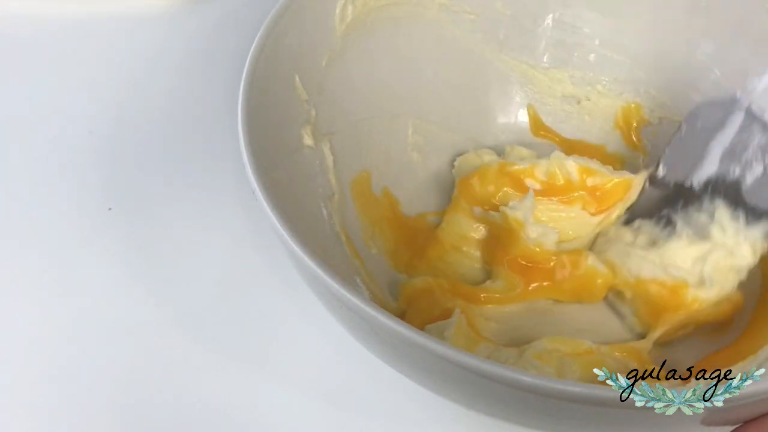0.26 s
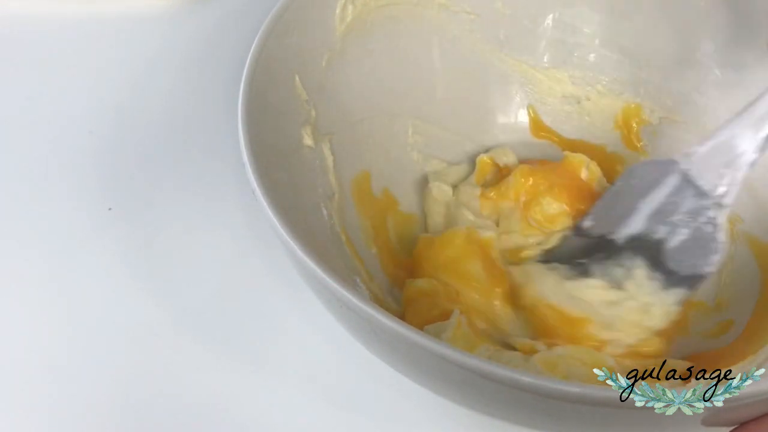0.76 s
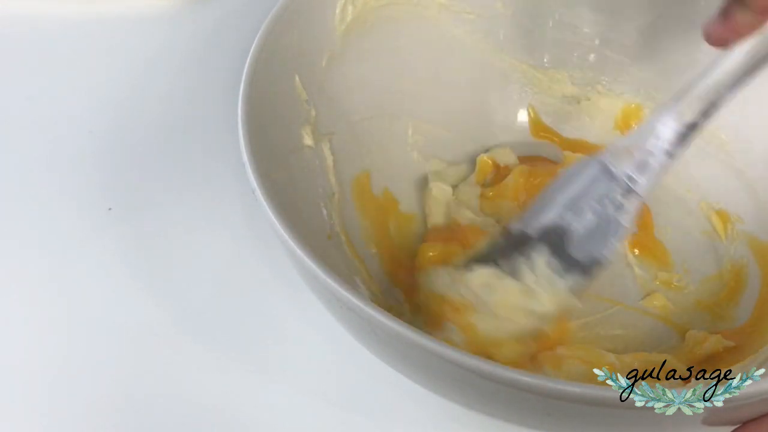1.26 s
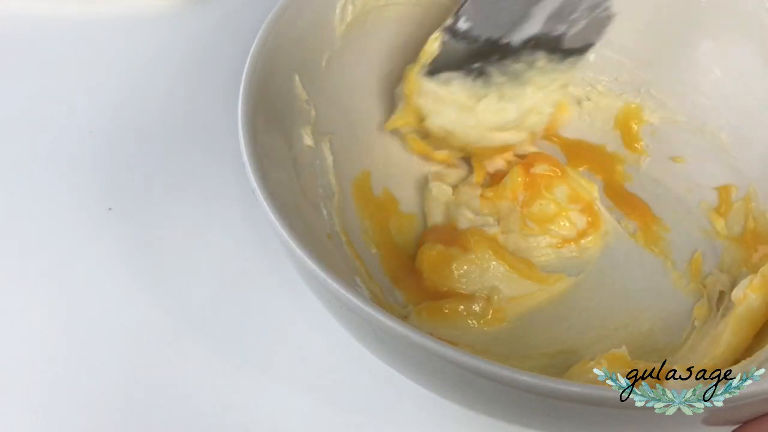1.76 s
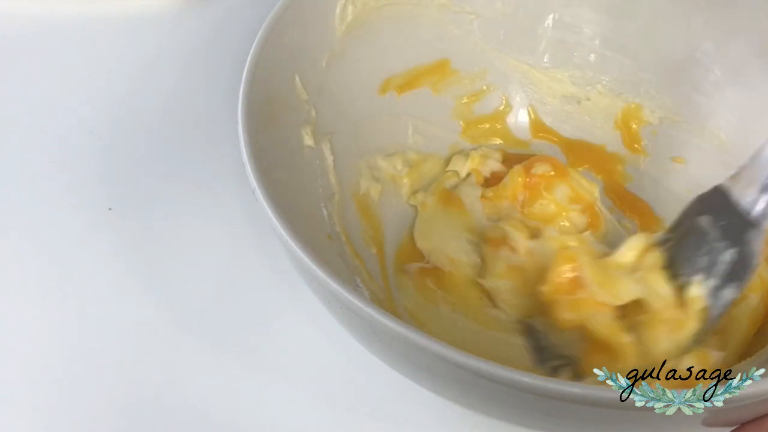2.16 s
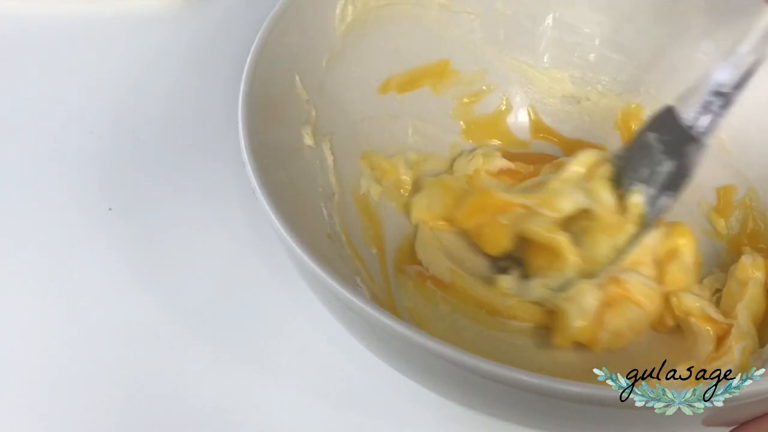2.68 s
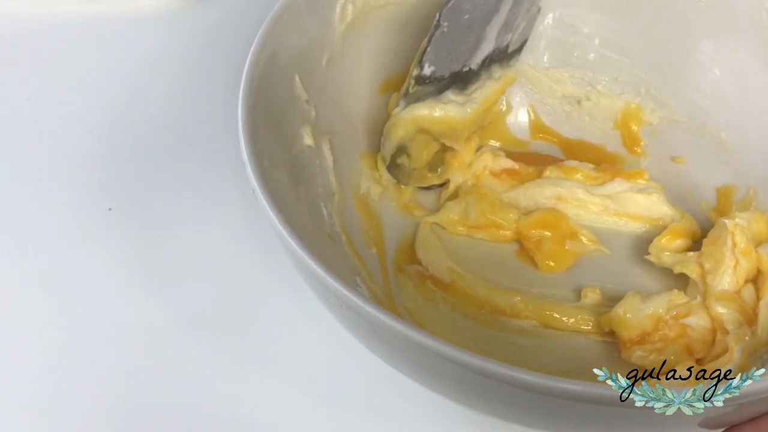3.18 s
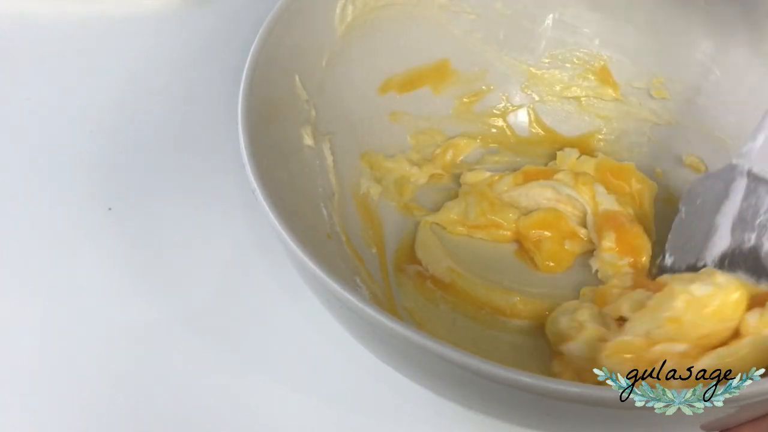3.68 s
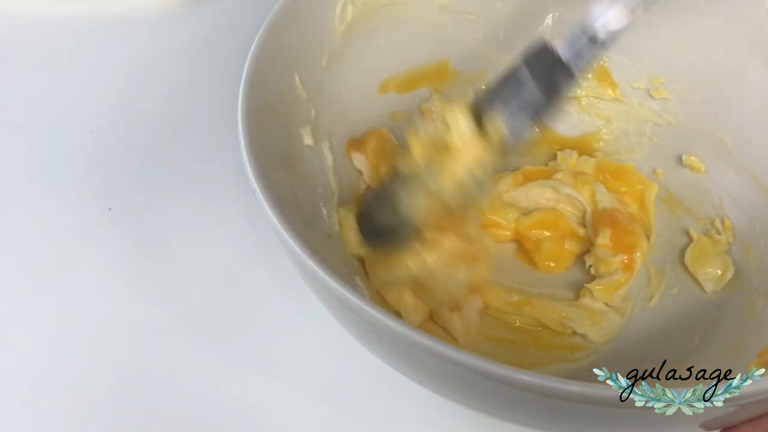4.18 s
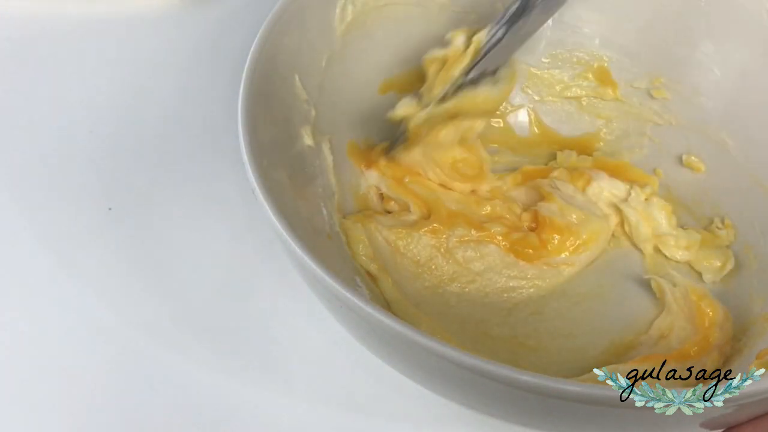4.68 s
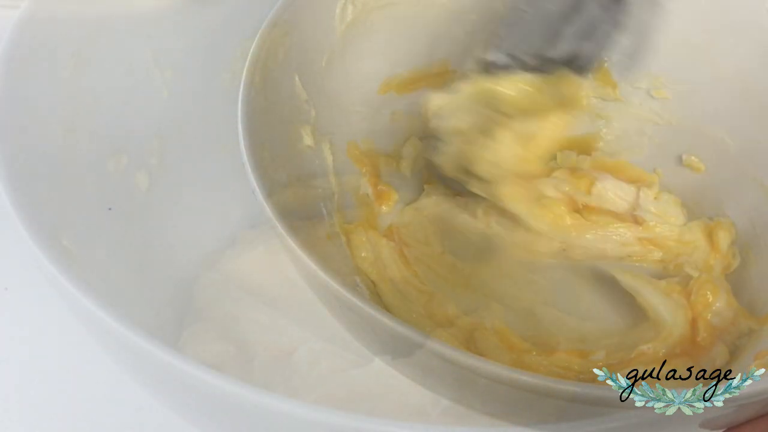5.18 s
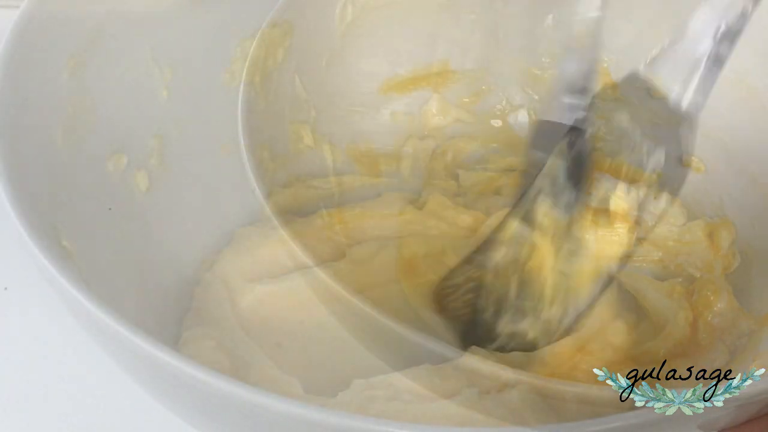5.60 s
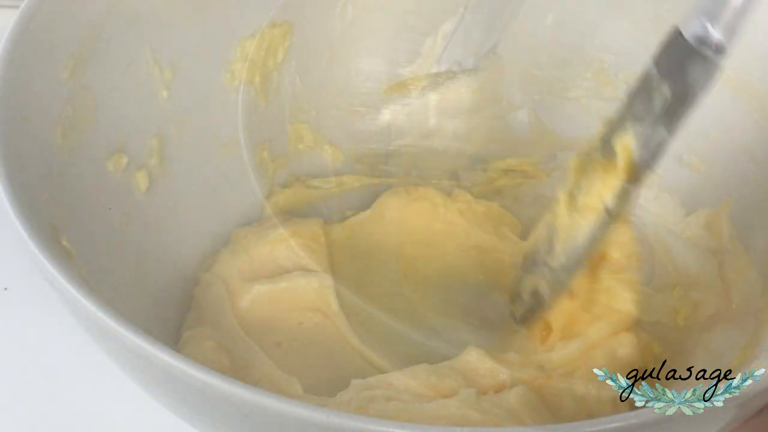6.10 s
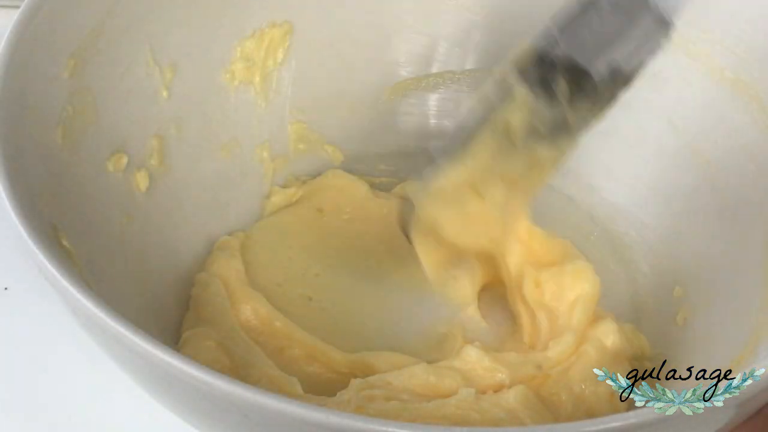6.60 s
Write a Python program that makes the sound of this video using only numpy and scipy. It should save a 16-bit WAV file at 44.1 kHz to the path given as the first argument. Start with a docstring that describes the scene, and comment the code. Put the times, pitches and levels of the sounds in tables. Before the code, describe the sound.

A spatula folds a sticky buttery paste in a ceramic bowl, with wet smacks, smearing wipes, squelches and dull bowl thumps in a small kitchen.

```python
"""A spatula folds egg yolk into soft butter in a ceramic bowl on a kitchen table, over room air, whine and hum.
A light bump opens it: pushes ring bowl and table top. Wet smacks and wipes follow at once: torn films
ring cavities, and noise grains make smear and crackle. Squelches, gliding bands of hiss, join soon after.
From 1.9 s a few lumps plop as short sine tones. The hardest bumps come between 2.6 s and 4.8 s, with one
long squeeze at 3.4 s. Then the bumps thin out while wipes and faint smacks go on. A small room answers."""
import sys
import numpy as np
from scipy import signal
from scipy.fft import rfft, irfft
from scipy.io import wavfile

SR = 44100
rng = np.random.default_rng(int(sys.argv[2]) if len(sys.argv) > 2 else 0)


def pcm_store(signal):
    """Save signal as 16-bit PCM."""
    levels = np.round(np.clip(np.atleast_2d(signal), -1, 1) * 32767)
    wavfile.write(sys.argv[1], SR, levels.astype(np.int16).T)


N = 302082

STIR_SMEAR_DB = -75   # light stirring between the wipes, before the smear's own trim


def from_db(db):
    """Turns decibels into an amplitude factor."""
    return 10 ** (np.asarray(db) / 20)


def rms_one(x):
    """Scales a signal to rms 1."""
    return x / np.sqrt(np.mean(x ** 2) + 1e-20)


def in_time(rows):
    """The columns of a curve, sample by sample."""
    s, *columns = np.transpose(rows)
    return [np.interp(np.arange(N) / SR, s, c) for c in columns]


def at_hz(points, hz):
    """Reads a curve over frequency on a log-frequency axis."""
    known_hz, values = np.transpose(points)
    return np.interp(np.log(np.maximum(hz, 1)), np.log(known_hz), values)


def coloured(x, spectrum):
    """Filters a signal by a spectrum; rms 1."""
    hz = np.linspace(0, SR / 2, N + 1)
    gain = from_db(at_hz(spectrum, hz))
    return rms_one(irfft(rfft(x, 2 * N) * gain)[:N])


def drift(rate):
    """A slow random wander: knots of spread 1, `rate` per second, joined by straight lines."""
    knots = rng.standard_normal(int(N / SR * rate) + 2)
    return np.interp(np.arange(N) / SR * rate, np.arange(len(knots)), knots)


def lowpass(x, hz, order=2):
    """Takes the treble off above a cut-off."""
    sos = signal.butter(order, min(hz, SR / 2 - 1), fs=SR, output="sos")
    return signal.sosfilt(sos, x + 1e-18)


def resonance(x, hz, width_hz):
    """A band of gain 1 on top."""
    b, a = signal.iirpeak(min(hz, SR / 2 - 1), hz / min(width_hz, SR / np.pi), fs=SR)
    return signal.lfilter(b, a, x)


def grains(per_s, spread_db):
    """Tiny ruptures at random moments, with random sizes and signs; rms 1."""
    size_db = spread_db * np.minimum(rng.exponential(1, N), 4)
    sizes = from_db(size_db) * rng.choice([-1, 1], N)
    return rms_one(sizes * (rng.random(N) < per_s / SR))


def knocks(rattle=0.018, rattle_s=0.016, thud_db=-6, slap_db=-41, slap_s=0.039, slap_rise_s=0.0014,
           slap_reach=1.9):
    """Each bump is one push, a brief rattle of the foot and a wet slap; a softer contact is duller."""
    # first dead thud of the contact, levels before thud_db: f/Hz, width/Hz, level/dB
    thud_bands = [(307, 33, 16.5), (540, 60, 15), (714, 117, 11.5)]
    # butter slapping the wall with each bump: f/Hz, relative level per hertz/dB
    slap_colour = [(200, -12), (450, 7), (800, 1), (1000, -5), (1500, -7.5), (2300, -23.5), (5000, -22),
                   (15000, -50)]
    out, t = np.zeros(N + SR), np.arange(SR) / SR
    splash = coloured(rng.standard_normal(N), slap_colour)
    slap_shape = from_db(slap_db) * (1 - np.exp(-t / slap_rise_s)) * np.exp(-t / slap_s)
    for s, db, contact_hz in bumps():
        at = int(max(s, 0) * SR)
        chatter = rattle * rng.standard_normal(SR) * np.exp(-t / rattle_s)
        bright_chatter = chatter - lowpass(chatter, 1700, order=1)
        push = lowpass(signal.unit_impulse(SR) + bright_chatter, contact_hz)
        thud = 0
        for k, (hz, width_hz, level_db) in enumerate(thud_bands):
            thud = thud + (-1) ** k * from_db(level_db + thud_db) * resonance(push, hz, width_hz)
        slap = lowpass(slap_shape * np.roll(splash, at)[:SR], slap_reach * contact_hz)
        ring = bowl(push, scatter_db=1.5, detune=0.022)
        out[at:at + SR] += from_db(db) * (lowpass(thud, 1130) + slap + ring)
    return out[:N]


def bumps():
    """The bowl bumps the table, then rocks back twice, weaker and duller each time."""
    # bumps: t/s, strength/dB, contact cut-off f/Hz, first rebound relative to the bump/dB
    table_bumps = [(.004, -14, 644, -13.5), (.624, -3, 1030, -16), (.763, -19.5, 2030, -27),
                   (1.361, -29.5, 910, -11), (1.919, -20.5, 890, -14), (2.022, -25, 850, -10),
                   (2.616, -6.5, 328, -26), (2.633, 2.5, 1080, -12.5), (3.255, 3.5, 1620, -11),
                   (3.929, 0.5, 1310, -19.5), (4.142, -16.5, 493, -20), (4.798, 1.5, 1200, -32),
                   (4.898, -9.5, 700, -26), (6.239, -22.5, 600, -17)]
    rock_s, rebound_loss_db, rebound_dulling = .05, 3.5, 0.71   # loss: second rebound below the first
    hits = []
    for s, db, hz, rebound_db in table_bumps:
        hits.append((s, db, hz))
        for k in range(1, 3):
            level_db = db + rebound_db - (k - 1) * rebound_loss_db
            hits.append((s + k * rock_s, level_db, hz * rebound_dulling ** k))
    return hits


def bowl(force, scatter_db=0, detune=0):
    """Rings the modes of bowl and table; neighbours swing oppositely, and the grip shifts high ones most."""
    # bowl and table top ring together, before scatter and detuning: f/Hz, level/dB, t60/s
    modes = [(52.4, -43, 0.83), (92.8, -40, 0.59), (133.1, -38.5, 0.8), (152, -39, 0.77),
             (176, -41.5, 0.067), (187, -27.5, 0.22), (209, -31, 0.085), (266.4, -36, 0.24),
             (291.8, -33, 0.14), (305.5, -36, 0.29), (360.4, -47, 0.44), (413, -44, 0.13),
             (439, -37.5, 0.13), (474.2, -30, 0.04), (488.5, -32, 0.11), (500, -49, 0.026),
             (577, -44.5, 0.21), (646, -43, 0.1), (686.3, -40, 0.12), (747.5, -37.5, 0.09),
             (793, -43, 0.094), (1195, -50.5, 0.11)]
    out = np.zeros(len(force))
    for k, (hz, db, t60) in enumerate(modes):
        shift = 1 + detune * min(hz / 1000, 1) * rng.normal()
        r = from_db(-60 / (t60 * SR))   # decay per sample
        w = 2 * np.pi * hz * shift / SR
        ring = signal.lfilter([0, np.sin(w)], [1, -2 * r * np.cos(w), r * r], force)
        out += (-1) ** k * from_db(db + scatter_db * rng.normal()) * ring
    return out


def plops(rise_s=0.00038):
    """A soft lump lands and gives one short, round tone: a decaying sine with a quick rise."""
    # lumps of butter drop back into the bowl: t/s, level/dB, f/Hz, t60/s
    lumps = [(1.924, -45.5, 196, 0.23), (2.022, -45.5, 269, 0.25), (2.051, -46.5, 174.7, 0.27),
             (5.657, -34.5, 184.5, 0.14)]
    out, t = np.zeros(N + SR), np.arange(SR // 2) / SR
    for s, db, hz, t60 in lumps:
        at = int(s * SR)
        shape = (1 - np.exp(-t / rise_s)) * np.exp(-np.log(1000) * t / t60)
        out[at:at + len(t)] += from_db(db) * shape * np.sin(2 * np.pi * hz * t)
    return out[:N]


def drag(smear_db):
    """The blade sticks and slips, and the bowl rumbles, more in a wipe and with swells where it catches."""
    # the blade catches on the bottom of the bowl: t/s, rumble level/dB, length/s
    catches = [(2.055, -54, 0.07), (5.785, -59.5, 0.15), (6.288, -64.5, .1)]
    drag_db, follows = -69, 0.44   # rumble under light stirring; share of the smear's swing in dB
    gain = from_db(drag_db + follows * (smear_db - STIR_SMEAR_DB))
    for s, db, length in catches:
        gain = gain + from_db(db) * pressure(s, length)
    slips = lowpass(grains(per_s=620, spread_db=6), 430, order=1)
    return gain * rms_one(bowl(slips))


def strokes():
    """The powers of the wipes add to steady light stirring; gives smear dB and crackle dB."""
    # the blade wipes the wall, levels before trims:
    # t of firmest pressure/s, smear level/dB, wet crackle level/dB, length/s
    wipes = [(0.081, -61, -66, .09), (.33, -60.5, -61.5, .05), (0.634, -59.5, -83, .05),
             (0.972, -58.5, -60.5, .075), (1.378, -61.5, -59.5, .055), (1.569, -58, -60, .05),
             (1.637, -62, -59, .04), (1.896, -59, -54, .025), (2.012, -59, -56.5, .05),
             (2.331, -67, -61, .04), (2.406, -72, -65, .035), (2.643, -55.5, -62.5, .035),
             (2.882, -61, -60.5, .035), (3.325, -60.5, -60.5, .07), (3.541, -55, -53, .085),
             (3.849, -60.5, -61, .085), (4.548, -60, -62, .06), (4.824, -61, -57, .045),
             (5.095, -59.5, -65, .045), (5.406, -59.5, -57, .035), (5.625, -62.5, -60, .05),
             (6.188, -64.5, -77, 0.061), (6.531, -69.5, -83, .12)]
    stir_crackle_db = -74
    smear_power, crackle_power = from_db(STIR_SMEAR_DB) ** 2, from_db(stir_crackle_db) ** 2
    for s, smear_db, crackle_db, length in wipes:
        press = pressure(s, length)
        smear_power = smear_power + (from_db(smear_db) * press) ** 2
        crackle_power = crackle_power + (from_db(crackle_db) * press) ** 2
    return 10 * np.log10(smear_power), 10 * np.log10(crackle_power)


def pressure(s, length):
    """The hand bears down on the blade, firmest at s, and lets go: a pointed exponential peak of 1."""
    press_share, release_share = 0.88, 1.1   # time constants as shares of the length
    t = np.arange(N) / SR - s
    away = np.abs(t) / (length * np.where(t < 0, press_share, release_share))
    return np.exp(-np.minimum(away, 10))


def smear(smear_db, wall_db=-3, flutter_db=4.0):
    """Paste shears along the wall in a grainy hiss whose level flutters."""
    # colour of the hiss: f/Hz, relative level per hertz/dB
    smear_colour = [(300, -7.5), (600, -1.5), (1000, -7.5), (2000, 1), (4000, -1), (6500, -14),
                    (15000, -30)]
    level = from_db(smear_db + wall_db + flutter_db * drift(90))
    return level * coloured(grains(per_s=1800, spread_db=3.0), smear_colour)


def crackle(crackle_db, clump_db=3.0, level_db=-1):
    """Fine bubbles burst in clumps as the butter parts: bright grains under a wandering level."""
    # colour of the bubbles: f/Hz, relative level per hertz/dB
    bubble_colour = [(2000, -7), (4500, -2.5), (7500, -3), (12000, -5), (16000, -11.5)]
    level = from_db(crackle_db + level_db + clump_db * drift(90))
    return level * coloured(grains(per_s=1400, spread_db=-1.5), bubble_colour)


def smacks(pockets, tear=0.15):
    """A film of butter cracks, tears on for a few milliseconds and rings the cavity behind it."""
    tear_s, crack_share = 0.0061, 0.54   # time to fall 27 dB; crack width as a share of its pitch
    out, t = np.zeros(N + SR), np.arange(SR // 20) / SR
    for s, cavity_db, cavity_hz, width_hz, crack_db, crack_hz in pockets:
        snap = tear * rng.standard_normal(len(t)) * np.exp(-np.pi * t / tear_s)
        snap[0] += 1
        cavity = resonance(resonance(snap, cavity_hz, width_hz), cavity_hz, width_hz)
        crack = resonance(snap, crack_hz, crack_share * crack_hz)
        at = int(s * SR)
        out[at:at + len(t)] += from_db(cavity_db) * cavity / np.abs(cavity).max()
        out[at:at + len(t)] += from_db(crack_db) * crack / np.abs(crack).max()
    return out[:N]


def small_pockets(smear_db, crack_db=-6, width=0.45, crack_ratio=1.04):
    """Faint smacks at random, likelier where the paste is worked harder: rows like the larger ones."""
    per_s, mean_db, spread_db = 3, -46.5, 5
    low_hz, high_hz = 7040, 13000
    work = np.cumsum(from_db(smear_db / 2))
    draws = rng.random((int(per_s * N / SR), 3))
    s = np.searchsorted(work, draws[:, 0] * work[-1]) / SR
    db = mean_db + spread_db * (2 * draws[:, 1] - 1)
    hz = low_hz * (high_hz / low_hz) ** draws[:, 2]
    return list(zip(s, db, hz, width * hz, db + crack_db, crack_ratio * hz))


def squelches(flutter_db=2.0):
    """Tiny ruptures ring a gap that changes size, so a band of hiss swells and glides."""
    # air squeezed along the blade, level before the swell:
    # start t/s, end t/s, level/dB, from f/Hz, to f/Hz
    glides = [(0.28, 0.373, -59.5, 2720, 3480), (0.794, .92, -70, 3500, 3400),
              (1.51, 1.66, -62, 3060, 1680), (2.827, 2.92, -69, 3930, 4200),
              (3.33, 3.417, -61.5, 2600, 3020), (3.558, 3.764, -58.5, 3500, 5300),
              (3.686, 3.945, -64, 2440, 1800), (4.795, 4.84, -55.5, 3600, 4000),
              (5.063, 5.13, -59.5, 890, 745), (5.453, 5.77, -66, 2180, 1230),
              (6.226, 6.41, -69.5, 540, 470)]
    # one long, hard squeeze round the wall, level before squeeze_db: t/s, gap f/Hz, level/dB
    squeeze = [(3.41, 1610, -57), (3.48, 1410, -53.5), (3.568, 2130, -50.5), (3.62, 2000, -51.5),
               (3.676, 1640, -59), (3.7, 1740, -62)]
    glide_width, squeeze_width, squeeze_db = 0.27, 0.14, -1.5   # half-widths as shares of the mean pitch
    out = np.zeros(N)
    shear = grains(per_s=1300, spread_db=0.5) * from_db(flutter_db * drift(80))
    for start, end, db, from_hz, to_hz in glides:
        span = slice(int(start * SR), int(end * SR))
        hz = np.geomspace(from_hz, to_hz, span.stop - span.start)
        swell = np.sin(np.linspace(0, np.pi, len(hz))) ** 0.35
        out[span] += from_db(db) * swell * gap(shear[span], hz, glide_width)
    hz, db = in_time(squeeze)
    span = slice(int(squeeze[0][0] * SR), int(squeeze[-1][0] * SR))
    fade = signal.windows.tukey(span.stop - span.start, .15)
    out[span] += from_db(db[span] + squeeze_db) * fade * gap(shear[span], hz[span], squeeze_width)
    return out


def gap(shear, hz, width):
    """A resonance that glides along a pitch curve; rms 1."""
    turn = np.exp(2j * np.pi * np.cumsum(hz) / SR)
    # shift the gliding pitch to zero, keep what lies near it, shift back
    near = lowpass(shear / turn, width * hz.mean())
    return rms_one(np.real(turn * near))


def kitchen(x, gap_s=.006):
    """Diffuse reverberation: decaying bands of noise, longest near 1 kHz, scaled to unit energy."""
    # what the walls give back: f/Hz, level/dB
    walls = [(100, 1), (3500, -7), (6000, -7), (15000, -0.5)]
    # reverberation time: f/Hz, t60/s
    room_t60 = [(100, 0.31), (1000, 0.7), (3500, 0.39), (8000, 0.35), (16000, 0.15)]
    t = np.arange(SR) / SR
    edges, tail = np.geomspace(60, 17000, 12), 0
    for low, high in zip(edges, edges[1:]):
        sos = signal.butter(2, [low, high], "band", fs=SR, output="sos")
        band = signal.sosfilt(sos, rng.standard_normal(SR))
        hz = np.sqrt(low * high)
        decay = np.exp(-np.log(1000) * t / at_hz(room_t60, hz))
        tail = tail + band * from_db(at_hz(walls, hz)) * decay
    tail = tail * (t > gap_s)
    return signal.fftconvolve(x, tail / np.linalg.norm(tail))[:N]


def background():
    """Still room air as coloured noise, a steady whine of sines and a low hum that wavers."""
    # room air: f/Hz, relative level per hertz/dB
    air_colour = [(15, -46), (25, -6.5), (70, 1.5), (157, -6.5), (545, -20), (1020, -20.5), (1890, -24.5),
                  (2050, -27.5), (2690, -28), (2990, -26.5), (4740, -33.5), (5880, -29), (7510, -33),
                  (13200, -30), (16000, -35)]
    # a thin, steady electrical whine: f/Hz, rms level/dB
    whine_tones = [(1001, -81), (2003, -82.5), (3005, -81.5), (4006, -81.5), (5008, -85.5), (6010, -82.5),
                   (7011, -83.5), (8013, -92), (9014, -82.5), (11017, -84)]
    air_db, hum_hz, hum_db = -59, 50.4, -60.5
    t = np.arange(N) / SR
    air = from_db(air_db) * coloured(rng.standard_normal(N), air_colour)
    whine = 0
    for hz, db in whine_tones:
        whine = whine + from_db(db) * np.sqrt(2) * np.sin(2 * np.pi * (hz * t + rng.random()))
    hum_level = from_db(hum_db + 2 * drift(5)) * np.sqrt(2)
    hum = hum_level * np.sin(2 * np.pi * hum_hz * t + drift(4))
    return air + whine + hum


def scene(thump_room_db=-12, smack_room_db=-7.5, paste_room_db=-10):
    """Everything sounds close by, with the kitchen answering."""
    # the larger air pockets open in the paste:
    # t/s, cavity peak level/dB, cavity f/Hz, cavity width/Hz, crack peak level/dB, crack f/Hz
    large_pockets = [(.047, -25, 2900, 1700, -39, 9000), (.056, -29.5, 5560, 5040, -23.5, 9800),
                     (.435, -42, 5000, 6000, -36, 12000), (.68, -33.5, 6140, 1900, -26.5, 11800),
                     (.763, -28.5, 3500, 3530, -36, 11000), (.795, -25.5, 3630, 1410, -39, 9100),
                     (.986, -30, 2360, 1000, -29, 4370), (1.006, -31.5, 4070, 3000, -39, 11000),
                     (1.362, -36, 12900, 7000, -50, 6000), (1.389, -35.5, 3670, 900, -49, 9000),
                     (1.494, -28, 8500, 4000, -38, 13000), (1.636, -47, 2500, 4000, -34.5, 9100),
                     (1.881, -39.5, 4900, 4000, -46, 9000), (2.069, -43.5, 1630, 1000, -32.5, 7000),
                     (2.093, -38, 6300, 3000, -50, 11000), (2.38, -36.5, 3580, 1400, -25.5, 9400),
                     (2.726, -33.5, 9900, 7000, -54, 5000), (3.233, -38.5, 6040, 5000, -35, 12500),
                     (4.179, -41.5, 2530, 3800, -53, 10000), (4.265, -39, 13000, 5960, -52, 7000),
                     (4.293, -28, 5200, 4000, -31, 8600), (4.326, -28, 6940, 10000, -36, 11000),
                     (4.575, -27, 12300, 7000, -40, 5970), (4.63, -38.5, 4440, 6000, -45, 11100),
                     (4.805, -33.5, 11500, 4000, -46, 6500), (4.898, -30.5, 1670, 2820, -43, 7440),
                     (5.05, -33.5, 11400, 4000, -43, 5000), (6.203, -48, 3940, 1200, -54, 9000)]
    smear_db, crackle_db = strokes()
    thumps = knocks() + plops() + drag(smear_db)
    paste = smear(smear_db) + crackle(crackle_db) + squelches()
    pops = smacks(large_pockets + small_pockets(smear_db))
    room_send = from_db(thump_room_db) * thumps
    room_send = room_send + from_db(smack_room_db) * pops + from_db(paste_room_db) * paste
    return (thumps + pops + paste + kitchen(room_send) + background())[None]


def record(dry, notch_hz=10600, notch_depth=0.36):
    """The microphone drops the deepest bass and the very top; its port has a shallow notch."""
    low_cut = signal.butter(4, 36, "high", fs=SR, output="sos")
    thinned = signal.sosfilt(low_cut, dry)
    ported = thinned - notch_depth * resonance(thinned, notch_hz, 1100)
    top_cut = signal.ellip(10, .1, 70, 16100, fs=SR, output="sos")   # steep cut at 16.1 kHz
    return signal.sosfilt(top_cut, ported)


dry = scene()
out = record(dry)
pcm_store(out)
```